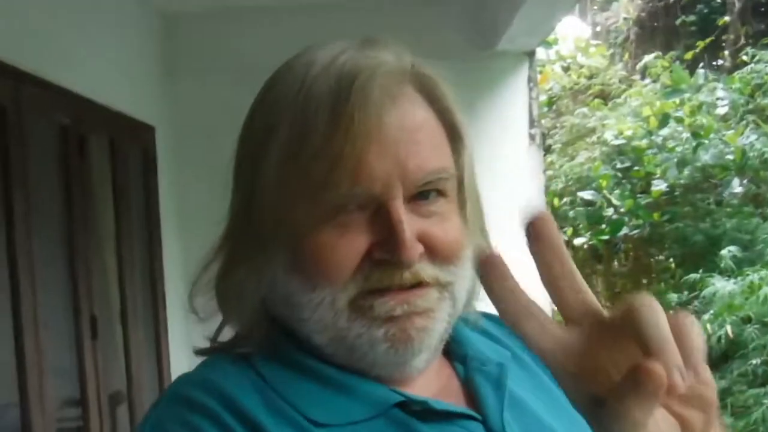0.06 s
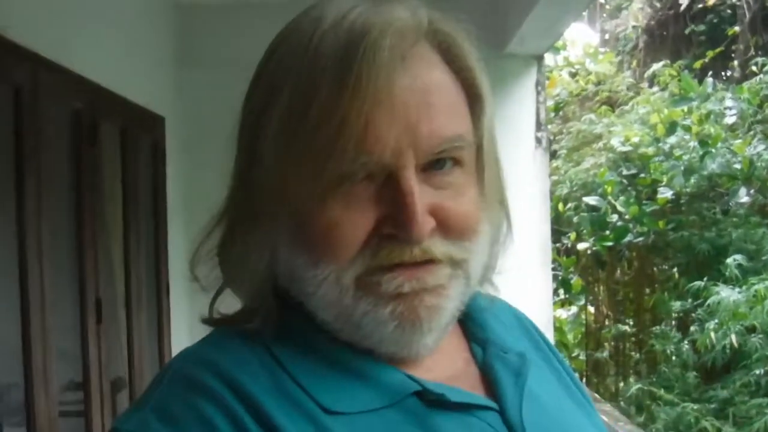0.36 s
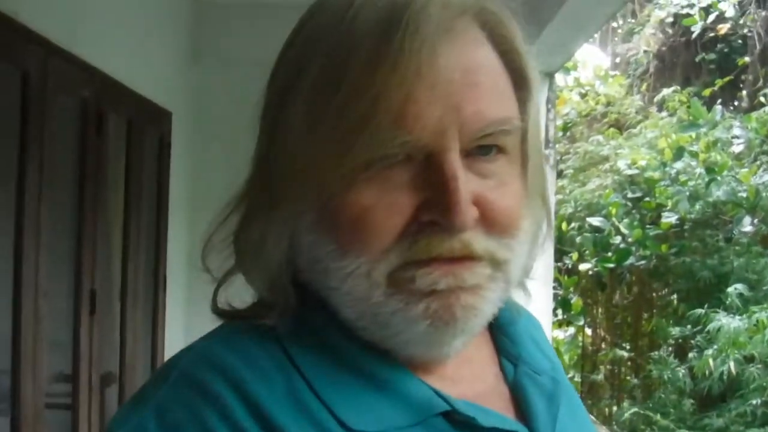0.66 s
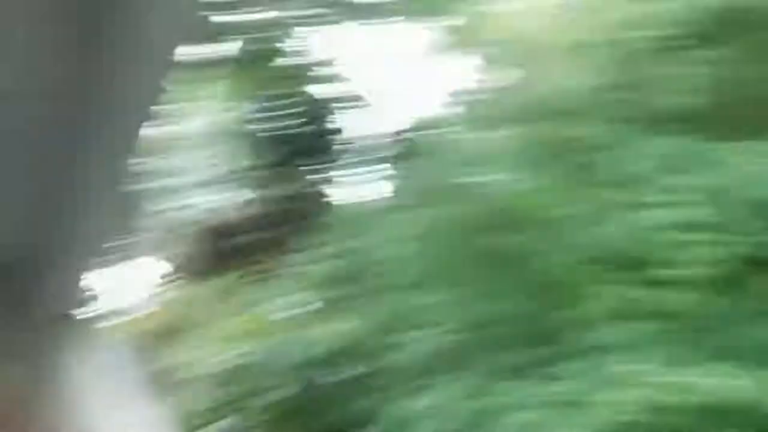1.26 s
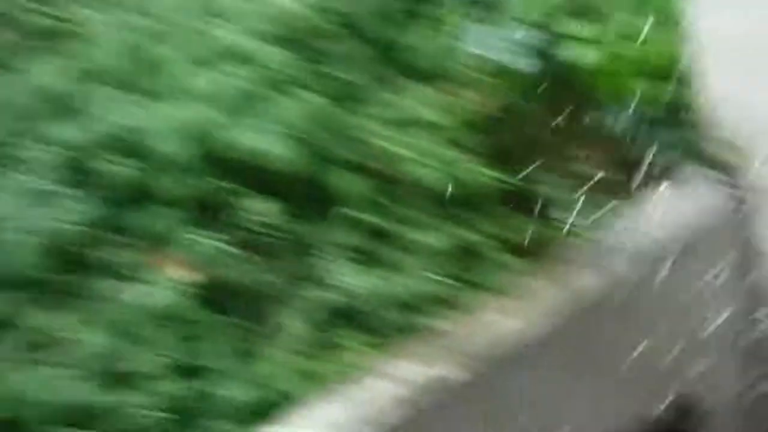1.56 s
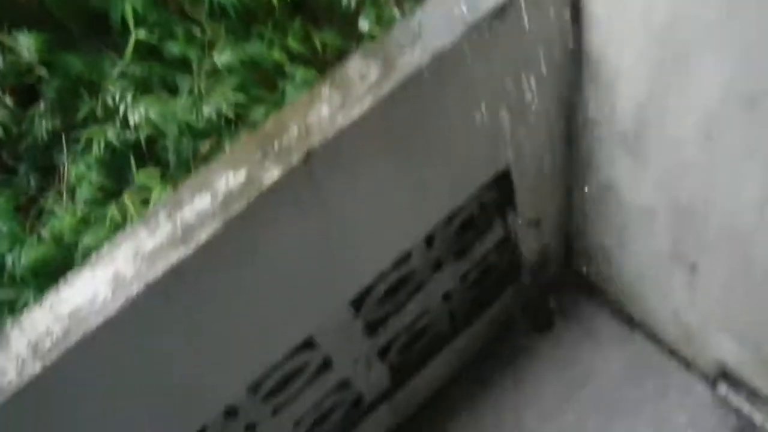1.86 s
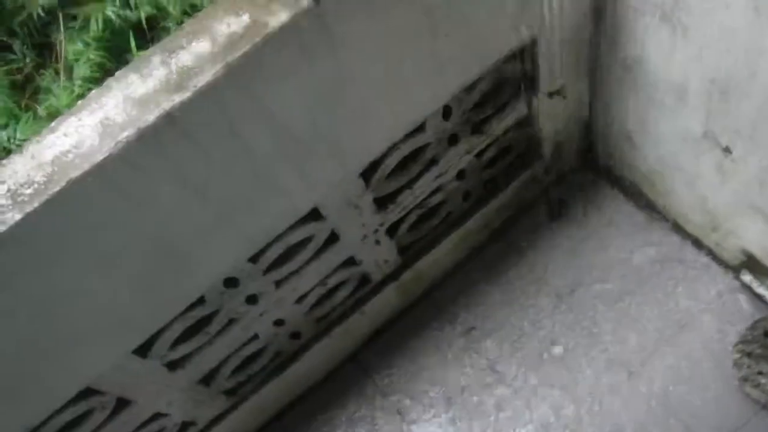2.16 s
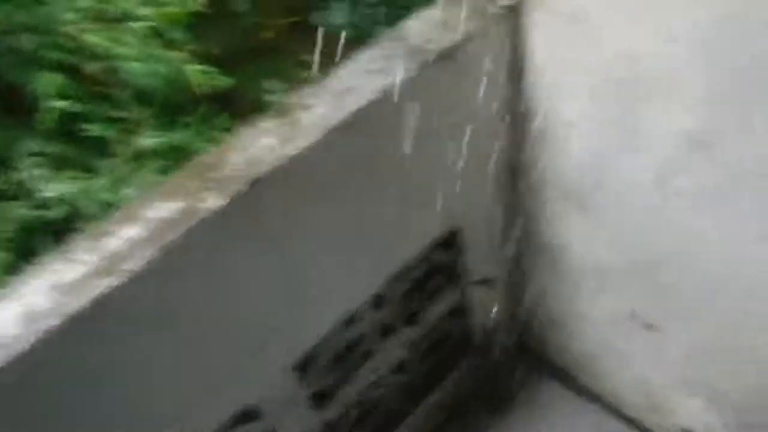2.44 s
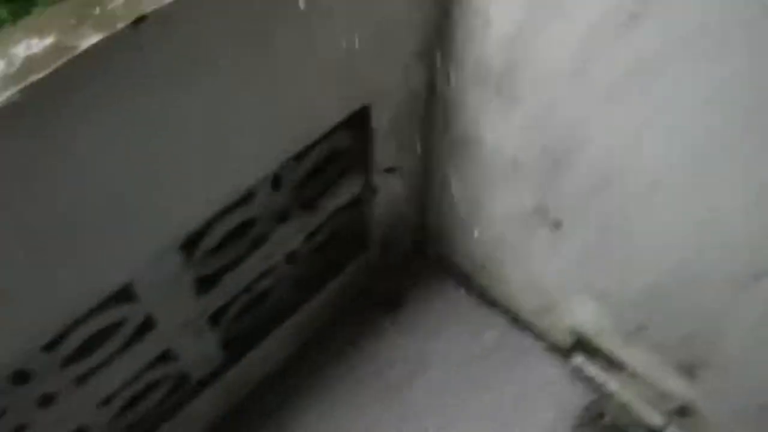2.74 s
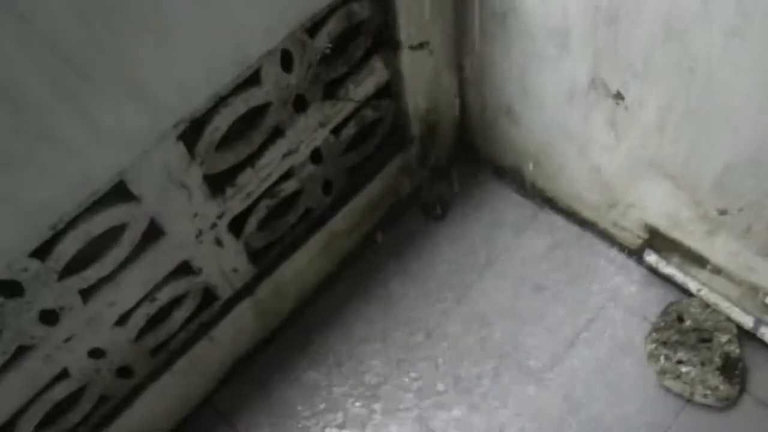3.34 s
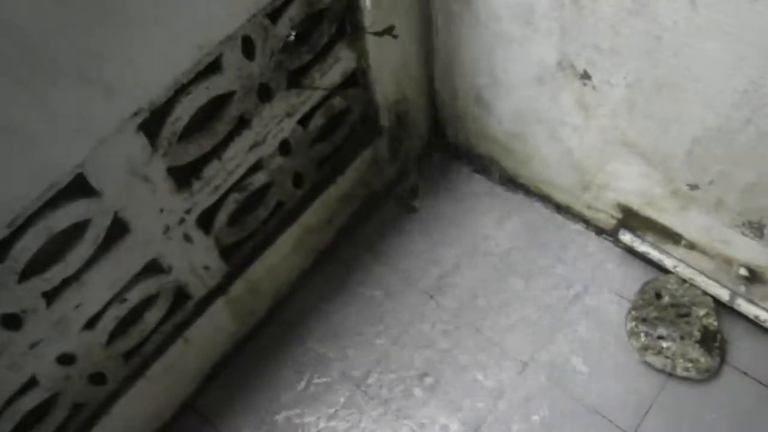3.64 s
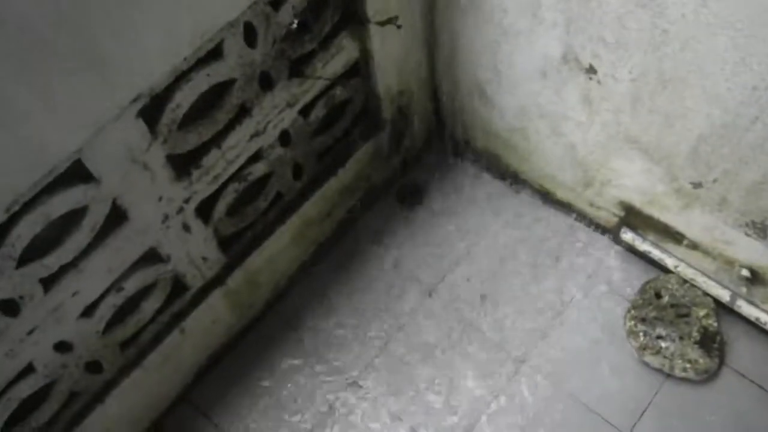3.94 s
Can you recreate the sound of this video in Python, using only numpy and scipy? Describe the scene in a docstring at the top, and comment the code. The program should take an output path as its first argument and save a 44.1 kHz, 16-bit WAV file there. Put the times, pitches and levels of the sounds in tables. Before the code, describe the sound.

Heavy rainwater pours off a roof and splashes onto a wet concrete balcony.

```python
"""Heavy rain runs off a roof onto a wet concrete balcony, while the garden hisses behind.
From the start, gobs of water patter down, big drops slap the floor or plunk into puddles, and the
walls echo briefly. From about 0.9 s, the largest gobs crack and burst into spray. Near 1.3 s the
microphone turns to face them, and the splashes grow more direct. From 2 s on, the hardest splashes
overload it, some with a dull low thump underneath; a hand knocks it softly at 2.9 s."""
import sys
import numpy as np
from scipy import signal
from scipy.fft import rfft, irfft, next_fast_len
from scipy.io import wavfile
from scipy.ndimage import map_coordinates

SR = 44100
rng = np.random.default_rng(int(sys.argv[2]) if len(sys.argv) > 2 else 0)


def unload_wav(signal):
    """Save mono or channel-first audio to the path in sys.argv[1] as 16-bit WAV at rate SR, clipped to [-1, 1]."""
    wavfile.write(
        sys.argv[1],
        SR,
        np.round(np.clip(np.atleast_2d(signal).T, -1, 1) * 32767).astype(np.int16),
    )


N = 176400

# Tone colours: how strong the lows and highs are. Each row: frequency in Hz, relative level in dB.
GARDEN_COLOUR = [(25, -15.5), (60, -20), (100, -29.5), (150, -18), (240, -18), (450, -12.5), (700, -14),
                 (1500, -12.5), (3700, -6), (8300, -3), (10000, -9.5), (15500, -24.5)]  # distant rain
AIR_COLOUR = [(20, 0.5), (45, -10), (110, -13.5), (300, -39), (1000, -91)]  # air on the microphone
THUMP_COLOUR = [(20, 3), (130, 3), (400, 2.5), (900, -13), (3000, -37)]  # a dull low thump
SPRAY_COLOUR = [(250, -42.5), (600, -28.5), (1100, -23.5), (2300, -11), (3500, -7.5), (5300, -5.5),
                (7000, -1), (8500, 0.5), (10000, -4.5), (12500, -14.5), (15500, -20.5)]  # tiny droplets landing
SLAP_COLOUR = [(200, -14), (900, -1), (1700, -1.5), (7000, 2.5), (11000, -4.5), (16000, -16)]  # shared by all slaps
CRACK_COLOUR = [(200, -36), (1200, -31), (2500, -16.5), (5000, -5.5), (8300, 5), (10000, -9),
                (12500, -18.5), (16000, -39)]  # a gob bursting
# Dull low thumps under the hardest splashes. Each row: start in seconds, relative level in dB.
LOW_THUMPS = [(2.16, -16), (2.53, -24), (3.069, -17.5), (3.253, -23)]
# Air pushing on the moving microphone. Each row: middle in seconds, half-width in seconds, level in dB.
AIR_PUFFS = [(1.255, 0.057, -45), (2.014, 0.02, -42), (2.125, 0.016, -38.5)]
# A hand's soft knock: start in seconds, peak level in dB, pitch in Hz.
HAND_KNOCK = (2.9, -35, 110)
# The echo of the walls. Each row: frequency in Hz, seconds it takes to fade by 60 dB.
ECHO_FADE = [(200, 0.7), (2000, 0.19), (8000, 0.25), (15000, 0.11)]
# How squarely the microphone faces the water. Each row: time in seconds, direct share from 0 to 1.
DIRECT_SHARE = [(1.15, 0.74), (1.45, 0.96)]
# The flow surging as the microphone turns to it. Each row: time in seconds, guide level in dB.
FLOW_CURVE = [(0, -16.5), (0.1, -24), (0.17, -17.5), (0.3, -20.5), (0.75, -20.5), (0.91, -18), (1.0, -20.5),
              (1.25, -22), (1.43, -19), (1.55, -18), (1.79, -21), (1.93, -17), (2.12, -18.5), (2.45, -17.5),
              (2.66, -18), (2.85, -17), (3.02, -20.5), (3.15, -18), (3.48, -18.5), (3.66, -16), (3.74, -19),
              (3.85, -18), (4.0, -16)]
# Drops into deeper water. Each row: start in seconds, relative level in dB, pitch in Hz.
PUDDLE_DROPS = [(0.155, -8, 3170), (0.439, -24, 1400), (0.457, -17, 1900), (0.745, -28, 790),
                (0.8422, -5, 3700), (0.8459, -2.5, 3840), (0.846, -27, 680), (1.1043, -18, 1500),
                (1.2255, -14.5, 1630), (1.4542, -13, 1800), (1.5316, -7.5, 2600), (1.572, -9, 3840),
                (1.5815, -10.5, 2660), (1.6468, -3.5, 4450), (1.6978, -18, 2330), (1.8164, -10, 3430),
                (1.9027, -4, 3400), (2.16, -1.5, 2470), (2.19, -6, 2360), (2.31, -20, 970),
                (2.621, -14, 2430), (2.6732, -6.5, 1890), (2.8495, -6, 2340), (3.4358, -3.5, 2450),
                (3.83, -9, 3080), (3.853, -17, 1710), (3.9423, -7, 2300)]
# Big drops on the wet floor. Each row: start in seconds, relative level in dB, band centre in Hz.
FLOOR_DROPS = [(0.226, -15.5, 3460), (0.954, -6, 5600), (1.024, -15, 12500), (1.0293, -11.5, 12500),
               (1.1144, -12, 3920), (1.2202, -13.5, 4100), (2.0316, -13.5, 4180), (2.397, -8, 5300),
               (2.8346, -11, 4330), (2.872, -10, 3150), (2.916, -6, 4700), (3.068, -4.5, 4500),
               (3.25, -8, 3400), (3.5134, -2.5, 4430), (3.5362, -9.5, 4470), (3.6145, -11, 3850),
               (3.693, -11.5, 4550), (3.9843, -11.5, 3370)]
# Gobs that burst. Each row: start in seconds, relative crack level in dB, relative spray level in dB.
BURSTING_GOBS = [(0.89, -12, -17), (0.98, -11, -23), (1.361, -10, -33), (1.494, -4, -21), (1.519, -8, -10),
                 (1.539, -8, -24), (1.628, -6.5, -35), (1.688, -8, -12), (1.713, -5, -24),
                 (1.75, -8.5, -25), (1.76, -7, -35), (1.888, -8, -22), (1.936, -8, -22), (1.97, -8, -22),
                 (2.009, -2.5, -17), (2.076, -11, -20), (2.184, -13, -18), (2.189, -6, -14),
                 (2.223, -7, -34), (2.251, -11, -28), (2.27, -7.5, -9.5), (2.308, -2, -17),
                 (2.33, -8.5, -25), (2.406, -0.5, -11.5), (2.472, -4, -27), (2.486, -9, -27),
                 (2.511, -6, -29), (2.527, 1.5, -8.5), (2.691, -9, -16), (2.812, -5.5, -12),
                 (2.85, -8, -13), (2.916, -10, -12), (2.928, 0, -18), (2.974, -9, -30),
                 (3.069, -4.5, -16.5), (3.109, -4.5, -29), (3.121, -8, -26), (3.159, -10, -15),
                 (3.251, -4.5, -7.5), (3.345, -7, -10.5), (3.361, -4.5, -5.5), (3.439, -6, -11),
                 (3.454, -15, -29), (3.535, -7, -16.5), (3.562, -7, -17), (3.666, -6, -6.5),
                 (3.693, -7.5, -9.5), (3.757, -3, -10), (3.806, -4.5, -24), (3.821, -7, -15),
                 (3.865, -4, -11), (3.881, -9, -19), (3.935, -7, -20), (3.988, -6, -28)]

TOP_HZ = 15750  # highest frequency kept
DROPLET_S = 0.00013  # time a droplet's ring takes to swell
TIME = np.arange(N) / SR


def amp(db):
    """Turn decibels into a number to multiply by."""
    return 10 ** (np.asarray(db) / 20)


def unit(x):
    """Scale to an average power of 1."""
    return x / np.sqrt(np.mean(x ** 2) + 1e-20)


def along(points, hz):
    """Read between (Hz, value) points, treating each octave as an equal step."""
    f, v = np.transpose(points)
    return np.interp(np.log(hz + 1), np.log(f + 1), v)


def around(hz, octaves):
    """A tone colour that is strongest at hz and falls away on both sides."""
    away = np.linspace(-8, 8, 33)
    return np.transpose([hz * 2 ** (away * octaves), -40 * np.log10(1 + away ** 2 / 2)])


def wobble(rate):
    """A smooth curve through rate random values a second."""
    return map_coordinates(rng.standard_normal(int(N * rate / SR) + 4), [TIME * rate])


def coloured(x, colour, size=4096):
    """Filter x to give it a tone colour."""
    gain = unit(amp(along(colour, np.fft.rfftfreq(size, 1 / SR))))
    # Folding the cepstrum makes the filter ring only after a hit, never before it.
    cepstrum = irfft(np.log(gain + 1e-6))
    cepstrum[1:size // 2] *= 2
    cepstrum[size // 2 + 1:] = 0
    return signal.fftconvolve(x, irfft(np.exp(rfft(cepstrum))))[:len(x)]


def add(track, s, sound):
    """Mix a sound into the track, starting at s seconds."""
    part = track[max(round(s * SR), 0):][:len(sound)]
    part += sound[:len(part)]


def blip(hz, cycles, size=4096):
    """One pitched ring that swells for the given number of cycles, then dies."""
    turns = hz * np.arange(size) / SR
    age = turns / cycles
    return (age * np.exp(1 - age)) ** 3 * np.sin(2 * np.pi * (turns + rng.random()))


def smack(colour, rise_s, size=2048):
    """One impact: coloured noise that swells and dies quickly."""
    hz = np.fft.rfftfreq(size, 1 / SR)
    age = np.arange(size) / SR / rise_s
    shape = age * np.exp(1 - age)
    noise = irfft(amp(along(colour, hz)) * np.exp(2j * np.pi * rng.random(len(hz))))
    hit = noise * shape
    return hit * np.linalg.norm(shape) / np.linalg.norm(hit) / np.sqrt(2)


def droplets(times, sizes, hz, rise_s, size=160):
    """A track of tiny fading rings, one for each droplet."""
    samples = np.arange(size)
    age = samples / SR / np.reshape(rise_s, (-1, 1))
    turns = hz[:, None] * samples / SR + rng.random((len(times), 1))
    rings = sizes[:, None] * age * np.exp(-age) * np.sin(2 * np.pi * turns)
    places = (np.abs(times) * SR).astype(int)[:, None] + samples
    return np.bincount(places.ravel(), rings.ravel(), N)[:N]


def garden():
    """Distant rain on leaves merges into a gently wavering hiss."""
    level_db = -26 + 0.62 * wobble(5.88)
    return amp(level_db) * unit(coloured(rng.standard_normal(N), GARDEN_COLOUR))


def low_bumps():
    """Dull thumps under the hardest splashes, plus puffs of air and a hand's knock on the microphone."""
    taps = np.zeros(N)
    for s, db in LOW_THUMPS:
        add(taps, s, amp(db + 11) * np.ones(1))
    puffs = sum(amp(db) * np.exp(-.5 * ((TIME - s) / width) ** 2) for s, width, db in AIR_PUFFS)
    rumble = unit(coloured(rng.standard_normal(N), AIR_COLOUR))
    out = coloured(taps, THUMP_COLOUR) + puffs * rumble
    s, db, hz = HAND_KNOCK
    add(out, s, amp(db) * blip(hz, cycles=1.05))
    return out


def swing(x, middle_s=1.26, half_width_s=0.11, dip_db=-2, above_hz=10000):
    """The highest hiss changes briefly while the microphone swings round."""
    treble = signal.sosfiltfilt(signal.butter(4, above_hz, "high", fs=SR, output="sos"), x)
    away = np.exp(-.5 * ((TIME - middle_s) / half_width_s) ** 2)
    return x + treble * (amp(dip_db * away) - 1)


def walls(x, slices=90, delay_s=.003):
    """The balcony's short echo. Water lands in different places, so each slice of time gets its own."""
    out = np.zeros(N)
    for part in np.array_split(np.arange(N), slices):
        hz, t, noise = signal.stft(rng.standard_normal(SR // 5), SR, nperseg=256)
        fade = amp(-60 * t / along(ECHO_FADE, hz)[:, None])
        tail = signal.istft(noise * fade, SR, nperseg=256)[1]
        add(out, part[0] / SR + delay_s, signal.fftconvolve(x[part], tail / np.linalg.norm(tail)))
    return out


def facing(water, echo_db=-9.5):
    """As the microphone faces the water, more sound comes straight to it and less off the walls."""
    share = np.interp(TIME, *np.transpose(DIRECT_SHARE))
    return np.sqrt(share) * water + walls(water * np.sqrt(amp(echo_db) ** 2 + 1 - share))


def plops(per_s, low_hz, octaves, cycles):
    """Small drops land in the puddles, each ringing briefly at its own dull pitch."""
    n = int(per_s * N / SR)
    hz = low_hz * 2 ** (octaves * rng.random(n))
    sizes = amp(5.1 * np.minimum(rng.standard_normal(n), 2))
    return unit(droplets(rng.uniform(0, N / SR, n), sizes, hz, cycles / hz, size=1000))


def patter(per_s):
    """Thousands of tiny droplets tick on the floor at random."""
    n = int(per_s * N / SR)
    sizes = amp(4.4 * np.minimum(rng.standard_normal(n), 2))
    ticks = droplets(rng.uniform(0, N / SR, n), sizes, rng.uniform(0, TOP_HZ, n), DROPLET_S)
    return unit(coloured(ticks, SPRAY_COLOUR))


def spray(times, sizes, flight_s, scatter_db, count):
    """Each gob throws droplets; the later they land, the fewer and softer they are."""
    delay = rng.exponential(1, (len(times), count))
    scatter = amp(scatter_db * np.minimum(rng.standard_normal(delay.shape), 2))
    strengths = sizes[:, None] * scatter * np.exp(-.3 * delay)
    landings = times[:, None] + flight_s * delay
    hz = rng.uniform(0, TOP_HZ, delay.size)
    return unit(coloured(droplets(landings.ravel(), strengths.ravel(), hz, DROPLET_S), SPRAY_COLOUR))


def runoff(gobs_per_s=110):
    """Water falls steadily from the roof edge: splashing gobs over a fine patter."""
    n = int(gobs_per_s * N / SR)
    times = (np.arange(n) + 2 * rng.random(n)) / gobs_per_s
    gobs = spray(times, amp(rng.uniform(-7.0, 6.3, n)), flight_s=.0007, scatter_db=0.5, count=20)
    flow_db = np.interp(TIME, *np.transpose(FLOW_CURVE))
    surge_db = flow_db - flow_db.mean()
    # The gobs swell more than the patter, so they stand out when the water is near.
    water = amp(-3.5 + 1.78 * surge_db) * gobs + amp(-2 + 1.35 * surge_db) * patter(per_s=4500)
    flutter_db = 1.8 * wobble(70)
    return amp(flow_db.mean() + flutter_db) * water


def plunks(tick_db=-8.5, ring_db=2, fall_back_db=-18):
    """A drop ticks on deeper water, the hollow it makes rings, then the water falls back."""
    out = np.zeros(N)
    for s, db, hz in PUDDLE_DROPS:
        add(out, s, amp(db + tick_db) * smack(around(1.34 * hz, octaves=0.53), rise_s=0.00036))
        add(out, s, amp(db + ring_db) * blip(hz, cycles=1.55))
        add(out, s + 0.0026, amp(db + fall_back_db) * smack(around(hz, octaves=0.35), rise_s=0.004))
    return out


def slaps(boost_db=6.5):
    """Big drops hit the thin film of water on the concrete with a short slap."""
    out = np.zeros(N)
    for s, db, hz in FLOOR_DROPS:
        band_hz, band_db = around(hz, octaves=0.83).T
        colour = np.transpose([band_hz, band_db + along(SLAP_COLOUR, band_hz)])
        add(out, s, amp(db + boost_db) * smack(colour, rise_s=0.00071))
    return out


def bursts(crack_boost_db=6.5, spray_trim_db=-9):
    """The largest gobs land with a sharp crack and throw a shower of spray."""
    cracks = np.zeros(N)
    times, crack_db, spray_db = np.transpose(BURSTING_GOBS)
    for s, db in zip(times, crack_db):
        add(cracks, s, amp(db + crack_boost_db) * smack(CRACK_COLOUR, rise_s=0.00056))
    sizes = amp(spray_db)
    shower = spray(times, sizes, flight_s=.018, scatter_db=4.5, count=45)
    return cracks + amp(spray_trim_db) * sizes.mean() * shower


def scene():
    """Mix the splashes, their echo, the garden and the bumps into one channel."""
    puddles = amp(-39) * plops(per_s=130, low_hz=1570, octaves=1.52, cycles=0.44)
    gurgle = amp(-50) * plops(per_s=110, low_hz=582, octaves=1.26, cycles=1.35)
    water = runoff() + puddles + gurgle + slaps() + plunks() + bursts()
    return (swing(facing(water) + garden()) + low_bumps())[None]


def record(dry):
    """Overload flattens the hardest splashes, then everything above TOP_HZ is cut away."""
    ceiling, hardness = 0.97, 6
    clipped = dry / (1 + np.abs(dry / ceiling) ** hardness) ** (1 / hardness)
    size = next_fast_len(N + SR // 2)
    kept = np.fft.rfftfreq(size, 1 / SR) < TOP_HZ
    return irfft(rfft(clipped, size) * kept, size)[..., :N]


dry = scene()
out = record(dry)
unload_wav(out)
```